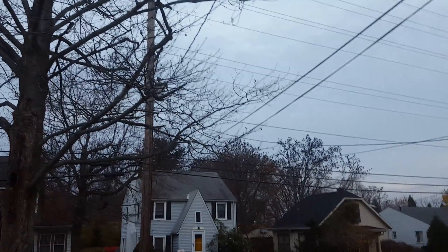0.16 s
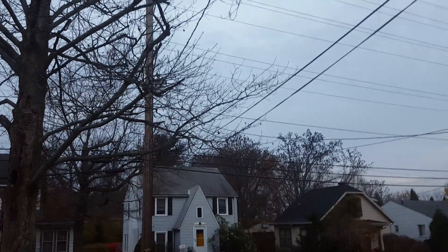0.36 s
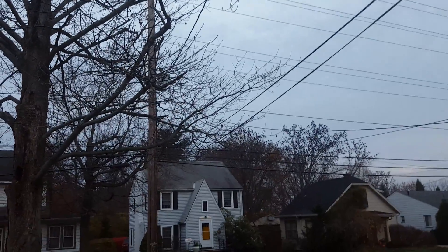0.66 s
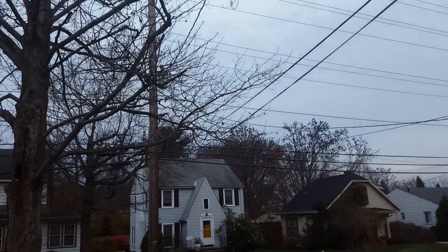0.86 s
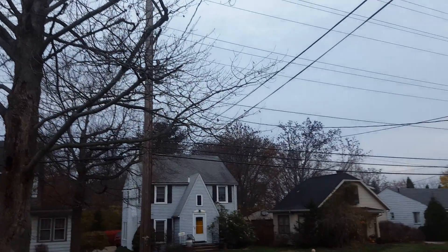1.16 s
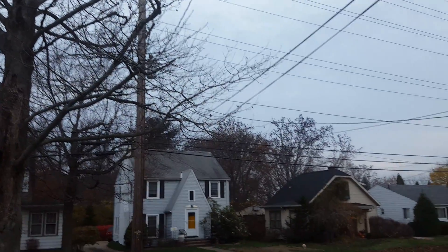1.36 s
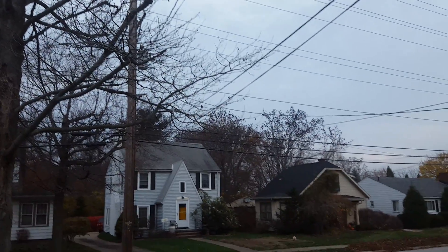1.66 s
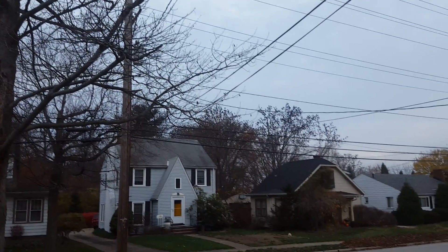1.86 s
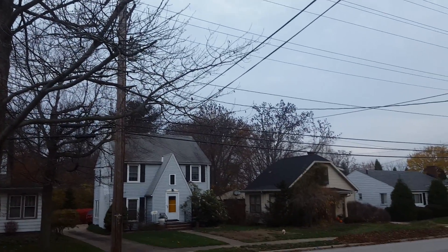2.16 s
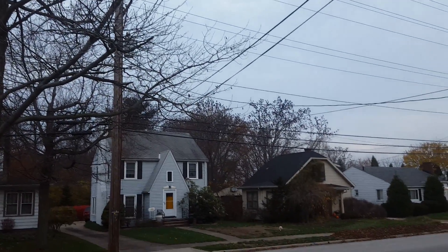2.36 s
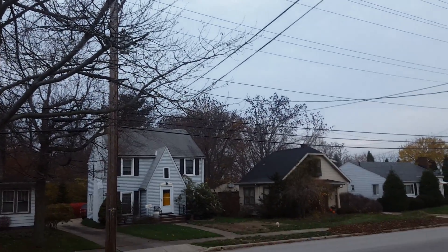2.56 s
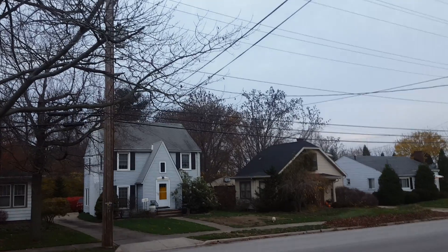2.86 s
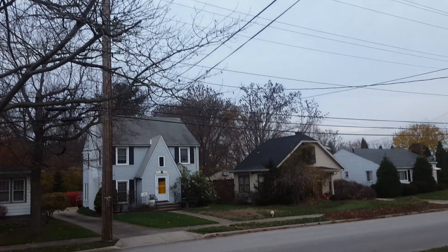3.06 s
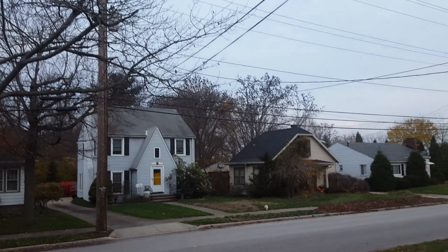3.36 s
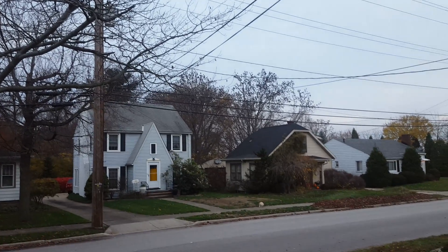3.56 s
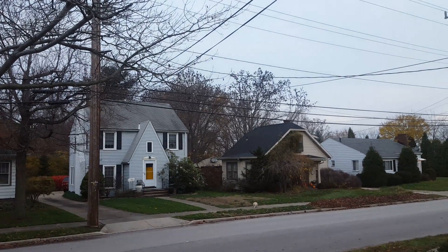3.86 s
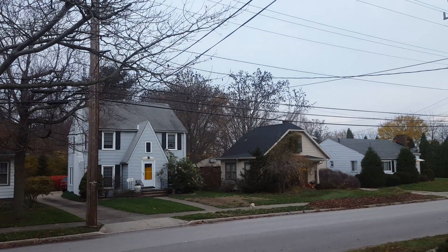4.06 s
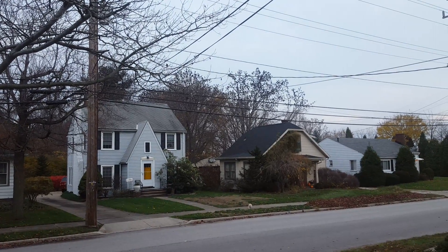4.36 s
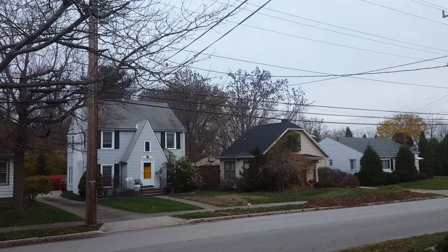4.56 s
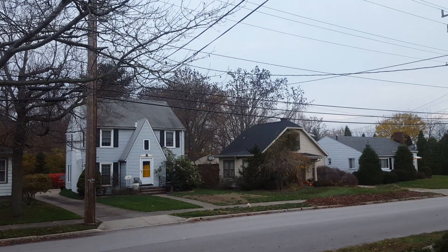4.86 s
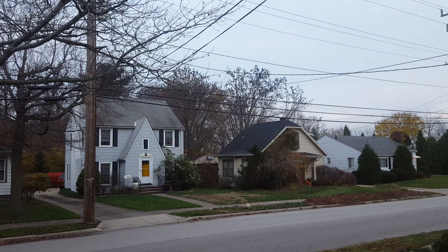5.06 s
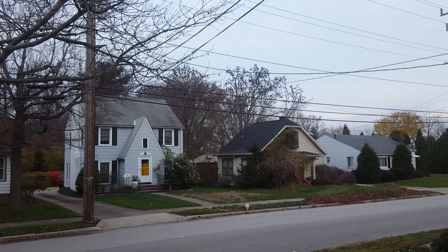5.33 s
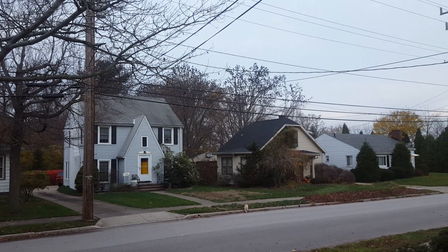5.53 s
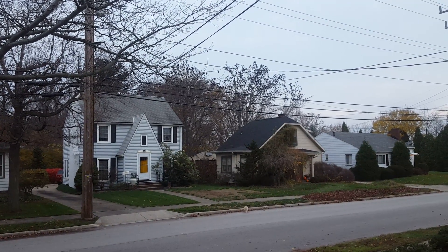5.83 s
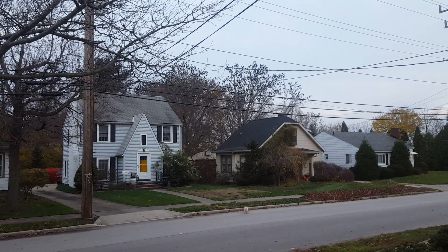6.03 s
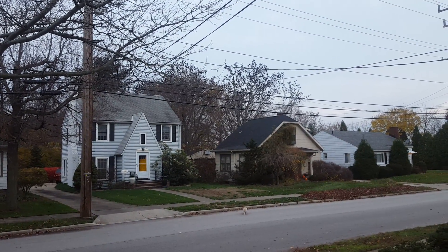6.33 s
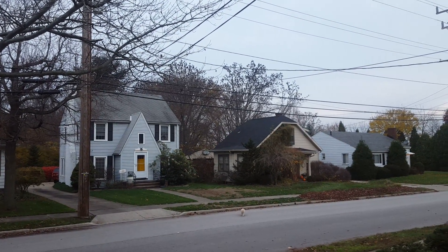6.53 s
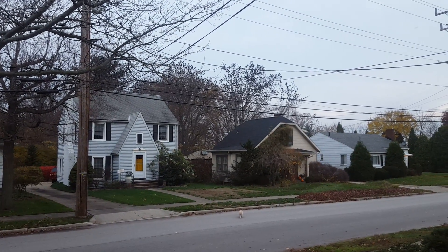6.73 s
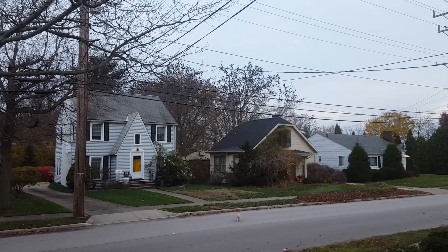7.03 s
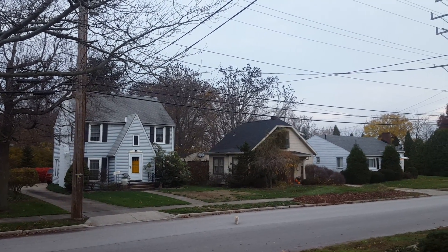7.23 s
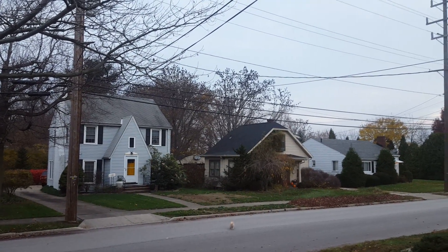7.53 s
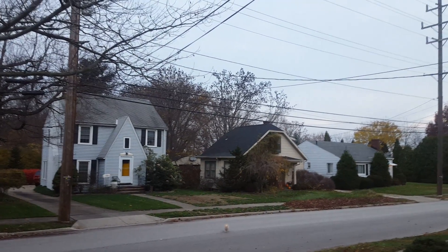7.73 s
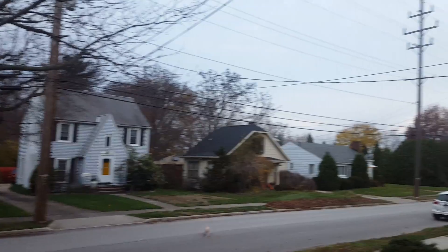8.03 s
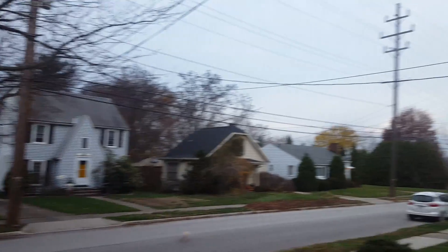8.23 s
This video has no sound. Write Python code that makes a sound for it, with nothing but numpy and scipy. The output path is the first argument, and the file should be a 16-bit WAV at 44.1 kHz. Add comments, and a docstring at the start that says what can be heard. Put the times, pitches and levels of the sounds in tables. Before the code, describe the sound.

Dense starling chatter fills the outdoor air from start to finish, already in full flow and never pausing. Squawks form the middle, with shriller squeals above swelling slightly. Short high chirps and scratchy rasps from closer birds stand out. Faint far traffic lies beneath. Soft bumps occur around two and six seconds; a rough buzzing call precedes several quick thuds close to the end. Diffuse, echoing street ambience, slightly coloured by a small stereo device.

```python
"""From the start a huge flock of starlings in bare street trees washes over far traffic and a faint hum.
Gliding, buzzing calls by the hundred merge with hiss and echo diffusely; nearer arched whistles stand out.
Rasps of rattling noise join after 1 s; dull thumps, decaying sines, knock near 2.4 s and again at 6.5 s.
Near 7.4 s a run of falling sweeps makes one harsh buzz, and a cluster of thumps follows from 7.6 s.
Throughout, two microphone ports colour left and right with their own resonances."""
import sys
import numpy as np
from scipy import signal
from scipy.fft import rfft, irfft, next_fast_len
from scipy.io import wavfile
from scipy.ndimage import uniform_filter1d, map_coordinates

SR = 44100
rng = np.random.default_rng(int(sys.argv[2]) if len(sys.argv) > 2 else 0)


def file_out(sig):
    """Save sig as 16-bit WAV at sys.argv[1]."""
    # one column per channel
    cols = np.atleast_2d(sig).T
    # limit, then scale
    lim = np.clip(cols, -1, 1)
    pcm = np.round(lim * 32767).astype(np.int16)
    wavfile.write(sys.argv[1], SR, pcm)


N = 369994

# relative colour of the far traffic: (frequency [Hz], density [dB per Hz])
TRAFFIC_COLOUR = [(24, -32), (33, -13), (52, -5.5), (70, 1), (115, -6.5), (160, -14.5), (260, -11.5),
                  (450, -16.5), (900, -12), (3000, -46)]
# dull thumps: (time [s], level before attack and decay [dB], pitch [Hz], time to fall 60 dB [s])
THUMPS = [(2.354, -36, 218, 0.026), (2.518, -36, 108, .08), (6.457, -40, 155, 0.17),
          (7.585, -30, 128, 0.063), (7.634, -24.5, 142, 0.036), (7.644, -26, 210, 0.053),
          (7.685, -33, 200, .06), (7.714, -33, 120, 0.085), (7.8168, -18, 335, 0.011),
          (7.832, -26, 116, 0.06)]
# toneless rasps: (time [s], length [s], level [dB])
SCREECHES = [(1.076, .089, -40), (1.51, .048, -38), (1.664, 0.056, -39), (1.75, 0.13, -41),
             (2.153, 0.11, -46), (2.47, 0.11, -43), (2.75, .07, -53), (3.22, 0.12, -40.5),
             (3.796, 0.14, -36), (4.825, 0.08, -34), (5.14, 0.17, -38), (6.8, 0.13, -40),
             (7.172, 0.12, -39), (7.37, 0.09, -37), (7.75, 0.26, -52), (8.358, .06, -33)]
# relative colour of the rasps: (frequency [Hz], density [dB per Hz])
SCREECH_COLOUR = [(2500, -25), (4000, 0), (7200, 2), (8600, -18), (12000, -18), (15000, -42)]
# nearer birds, before arch, rasp and a common trim:
# (time [s], length [s], start [Hz], end [Hz], rasp [0-1], level [dB], left over right [dB])
NEAR_CALLS = [(0.01, 0.16, 6620, 6570, 0.02, -42.5, 4), (.263, 0.039, 6150, 6000, 0.1, -43, -5),
              (0.366, .04, 4020, 3950, 0, -43, 1), (0.495, 0.14, 6450, 6120, 0.15, -44, 0),
              (0.798, 0.12, 6540, 6430, 0.3, -41.5, -5), (.915, .045, 4780, 4680, .1, -43, -4),
              (1.285, 0.053, 3300, 3360, .1, -43, 0), (1.737, 0.065, 6740, 6780, 0.43, -37, 2),
              (1.79, .085, 6800, 6450, 0.52, -44, 0), (1.75, 0.11, 10000, 10800, .5, -55, -5),
              (1.768, 0.032, 6650, 6160, 0.2, -38, 0), (1.78, .05, 6030, 5830, 0.04, -36, 0),
              (1.823, 0.083, 2500, 2620, 0, -42.5, 8), (1.89, 0.041, 2670, 2700, .1, -39, 0),
              (1.95, 0.043, 6110, 6130, 0, -37.5, 2), (1.96, .035, 6650, 6680, .4, -44, 0),
              (1.975, 0.11, 6170, 6290, 0.04, -41, 4), (1.98, .09, 9330, 9380, 0.1, -57, 0),
              (2.97, .07, 10200, 10450, .2, -57, 0), (3.39, 0.098, 8950, 9050, .03, -56, 0),
              (2.17, .17, 7400, 7100, .15, -44, 0), (2.269, 0.052, 6440, 6600, 0.53, -41, 8),
              (2.282, .041, 5030, 5200, .5, -40, -3), (2.551, 0.04, 6640, 6860, 0.4, -34.5, -5),
              (2.828, 0.046, 7100, 7450, .1, -42, 0), (3.13, .055, 8300, 8250, .3, -51, 1),
              (3.36, 0.059, 4530, 4380, 0.12, -37.5, 8), (3.61, 0.077, 6870, 7340, 0.3, -35.5, 3),
              (3.662, 0.07, 7500, 7230, .15, -39.5, 1), (4.011, .07, 6800, 7230, 0.66, -42, -3),
              (4.03, .044, 4550, 4470, 0, -39, 0), (4.47, 0.068, 4670, 4760, 0.2, -33, 1),
              (4.568, 0.07, 6450, 6550, 0.2, -41, 3), (4.705, .05, 2680, 2780, .3, -39, -3),
              (4.957, .05, 8400, 8000, .5, -48, -2), (5.358, 0.042, 5160, 5240, 0.05, -36, 4),
              (5.519, 0.0685, 5030, 5460, 0.15, -37, 5), (5.78, .07, 10500, 10200, .1, -57, -10),
              (5.904, 0.074, 6350, 6450, 0.35, -40.5, 0), (6.11, .04, 2680, 2580, .3, -38, -3),
              (6.2, .045, 2650, 2500, 0.7, -35, -1), (6.301, 0.18, 6800, 7100, .55, -39.5, 1),
              (6.32, .14, 10500, 10600, 0.4, -58, -7), (6.465, .125, 4300, 4000, 0.2, -43, 1),
              (6.516, 0.034, 2760, 2740, 0.2, -35, -4), (6.59, .045, 4800, 4920, .1, -41, 3),
              (6.698, 0.077, 6720, 6800, 0.47, -38, 0), (7.216, 0.11, 6250, 6500, 0.06, -43, -4),
              (7.555, 0.086, 5480, 5250, 0.1, -44, -4), (7.79, .11, 6550, 6650, 0.55, -40.5, -2),
              (8.165, 0.048, 6000, 6260, 0.23, -35.5, -2), (8.29, 0.11, 6430, 6370, 0.25, -47, -2)]
# relative colour of the flock: (frequency [Hz], density [dB per Hz])
FLOCK_COLOUR = [(60, -43), (250, -25), (450, -24.5), (520, -19), (640, -12), (950, -14), (1200, -7),
                (2100, -3), (3200, -0.5), (4400, -5.5), (7200, -9), (8550, -27.5), (10200, -27.5),
                (11700, -27), (15000, -51.5)]
# likeness of left and right in the flock: (frequency [Hz], coherence [-1 to 1])
LIKENESS = [(450, -0.29), (630, 0.54), (1050, -0.15), (1700, -0.12), (2200, 0.52), (2700, 0.028),
            (3250, -0.29), (4200, 0.1), (5200, -0.0095), (6400, -0.014), (12000, -0.16)]
# swell of the shriller squawks about SHRILL_DB: (time [s], level [dB])
SHRILL_SWELL = [(0.0, 0.5), (0.8, 0.5), (1.04, 0), (1.84, 0.5), (2.56, -2), (3.44, 1), (3.6, -0.5),
                (3.84, 0.5), (4.16, -1.5), (4.88, 0), (6.16, 0), (7.44, 0.5), (7.68, 0), (8.39, 0.5)]
# swell of the squeals about SQUEAL_DB: (time [s], level [dB])
SQUEAL_SWELL = [(0.0, 0.5), (0.56, 0.5), (1.6, -0.0), (1.76, 1.5), (2.08, -0.3), (2.24, 0), (2.64, 0),
                (3.2, -0.5), (3.44, -1.2), (3.68, 0), (4.16, -0.5), (4.96, 0), (5.04, -2.3), (5.36, 1.5),
                (5.6, -2), (5.92, 0.2), (6.16, -0.3), (6.4, -0.8), (6.56, -1.7), (6.72, 0), (7.68, -0.7),
                (7.84, 2.0), (8.08, -1), (8.39, -0.5)]
# resonances and notches of each microphone port: (centre [Hz], width [Hz], gain [dB])
LEFT_PORT = [(5557, 145, -5), (6603, 338, 9.7), (9140, 178, 3.9), (12280, 550, 7.3), (13790, 1060, 8.7)]
RIGHT_PORT = [(1605, 524, 2.7), (3520, 346, 2.5), (5147, 768, 5.5), (5784, 155, -6.3), (6483, 279, 6.5)]

HUM_HZ = 368  # a faint far machine
STREET_T60_S = .6  # time for the street echo to fall 60 dB
TOP_HZ = 15300  # band limit
CHATTER_DB, SHRILL_DB, SQUEAL_DB = -30, -35.5, -35.5
FLUTTER_DB, FLUTTER_PER_S = 1.8, 160  # unsteady strength within a nearer call
# the buzz: start, length, first and last centre pitch, sweep level before its attack and fade
BUZZ_S, BUZZ_LENGTH_S, BUZZ_HZ, BUZZ_DB = 7.369, .085, (4780, 4600), -36.5


def amp(db):
    """Decibels to gain."""
    return 10 ** (np.asarray(db) / 20)


def unit(x):
    """Scaled to rms 1."""
    return x / np.sqrt(np.mean(x ** 2) + 1e-20)


def along(points, hz):
    """(Hz, value) points read on a log frequency axis."""
    f, v = np.transpose(points)
    return np.interp(np.log(hz + 1), np.log(f + 1), v)


def level_curve(rows):
    """The gain of a (s, dB) curve at each sample."""
    return amp(np.interp(np.arange(N) / SR, *np.transpose(rows)))


def wobble(rate, size=N):
    """A smooth random curve with rate knots a second."""
    knots = rng.standard_normal(int(size * rate / SR) + 4)
    return map_coordinates(knots, [np.arange(size) * rate / SR])


def filtered(x, response):
    """x shaped by a response that is a function of frequency."""
    m = next_fast_len(N + SR // 2)
    return irfft(rfft(x, m) * response(np.fft.rfftfreq(m, 1 / SR)), m)[..., :N]


def whitened(x, size=801):
    """x with its long-term spectrum flattened inside its band; its movement in time stays."""
    z = rfft(x, next_fast_len(x.shape[1]))
    power = np.abs(uniform_filter1d(np.abs(z) ** 2, size))
    return irfft(z / np.sqrt(power + power.mean() / 10))


def add(track, s, sound):
    """Mix a sound into the track from time s on."""
    part = track[..., max(round(s * SR), 0):][..., :sound.shape[-1]]
    part += sound[..., :part.shape[-1]]


def street(x):
    """Diffuse echo of houses and trees: the energy in each band lingers and dies away as noise."""
    _, t, z = signal.stft(x, SR, nperseg=512)
    keep = amp(-60 * t[1] / STREET_T60_S) ** 2
    energy = signal.lfilter([1 - keep], [1, -keep], np.abs(z) ** 2)
    noise = signal.stft(rng.standard_normal(x.shape), SR, nperseg=512)[2]
    echo = signal.istft(np.sqrt(energy) * noise, SR, nperseg=512)[1][:, :N]
    return x.std() * unit(echo)


def town(rumble_db=-48.5, side_db=-18, hum_db=-69, drift=0.00583):
    """Far traffic as low noise, nearly alike in both ears, and a faint hum that wavers in pitch."""
    noise = rng.standard_normal((2, N))
    mid, side = unit(filtered(noise, lambda hz: amp(along(TRAFFIC_COLOUR, hz))))
    rumble = mid + amp(side_db) * np.array([side, -side])
    hum_hz = HUM_HZ * (1 + drift * wobble(3))
    hum = unit(np.sin(2 * np.pi * np.cumsum(hum_hz) / SR))
    return amp(rumble_db) * rumble + amp(hum_db) * hum


def thumps(attack_cycles=0.4):
    """Soft, low, decaying sine knocks; the deeper ones start more gently."""
    track, t = np.zeros(N), np.arange(SR // 4) / SR
    for s, db, hz, t60 in THUMPS:
        attack = 1 - np.exp(-t * hz / attack_cycles)
        add(track, s, amp(db - 60 * t / t60) * np.sin(2 * np.pi * hz * t) * attack)
    return track


def screeches(rattle_hz=110, rattle_db=1.0):
    """Toneless rasps from nearer birds: gated noise whose strength rattles at random."""
    strength = np.zeros(N)
    for s, length, db in SCREECHES:
        add(strength, s, amp(db) * signal.windows.tukey(int(length * SR)))
    hiss = filtered(rng.standard_normal((2, N)), lambda hz: amp(along(SCREECH_COLOUR, hz)))
    return strength * unit(hiss * amp(rattle_db * wobble(rattle_hz)))


def buzz(sweeps_per_s=170, sweep_s=0.016, fall=0.12, scatter=.025, fade_db=9, attack_s=.005):
    """A near bird's harsh buzz: rough, overlapping downward sweeps that fade into their echo."""
    rasp_depth, rasp_hz, echo_db = .04, 900, -6
    track, u = np.zeros((2, N)), np.linspace(0, 1, int(sweep_s * SR))
    for age in np.arange(0, BUZZ_LENGTH_S, 1 / sweeps_per_s):
        progress = age / BUZZ_LENGTH_S
        shake = scatter * rng.standard_normal() + rasp_depth * wobble(rasp_hz, size=len(u))
        hz = np.interp(progress, [0, 1], BUZZ_HZ) * (1 + shake - fall * (u - .5))
        ear_phase = rng.uniform(-1, 1, (2, 1))
        sweep = np.sin(np.pi * u) * np.sin(2 * np.pi * np.cumsum(hz) / SR + ear_phase)
        attack = np.interp(age, [0, attack_s], [.5, 1])
        add(track, BUZZ_S + age, attack * amp(BUZZ_DB - fade_db * progress) * unit(sweep))
    return track + amp(echo_db) * street(track)


def stray_chirps(low_hz, high_hz, length, glide, rasp, level_db, count):
    """Middle-distance calls at random moments, levelled by the flock's colour; rows as in NEAR_CALLS."""
    rows = []
    for when, high, long, bend, loud, side in rng.uniform(-1, 1, (count, 6)):
        s = (when + 1) / 2 * N / SR
        hz = low_hz * (high_hz / low_hz) ** ((high + 1) / 2)
        db = level_db + 2 * loud + along(FLOCK_COLOUR, hz)
        rows.append((s, length * np.exp(long / 2), hz, hz * (1 + glide * bend), rasp, db, 6 * side))
    return rows


def near_birds(arch=0.0208, rasp_depth=0.063, rasp_hz=700, level_db=-2, echo_db=-9):
    """Single arched whistles that flutter in strength; a raspy one shakes irregularly in pitch."""
    chirps = stray_chirps(low_hz=2100, high_hz=5000, length=.045, glide=.09,
                          rasp=.2, level_db=-41, count=240)
    whistles = stray_chirps(low_hz=5900, high_hz=7400, length=.06, glide=.035,
                            rasp=.08, level_db=-37.5, count=110)
    thin_whistles = stray_chirps(low_hz=7600, high_hz=11500, length=.06, glide=.025,
                                 rasp=.1, level_db=-35, count=60)
    track = np.zeros((2, N))
    for s, length, start_hz, end_hz, rasp, db, pan_db in NEAR_CALLS + chirps + whistles + thin_whistles:
        u = np.linspace(0, 1, int(length * SR))
        swell = np.sin(np.pi * u)
        shake = rasp * rasp_depth * wobble(rasp_hz, size=len(u))
        hz = (start_hz + (end_hz - start_hz) * u) * (1 + arch * (swell - .5) + shake)
        flutter = amp(FLUTTER_DB * wobble(FLUTTER_PER_S, size=len(u)))
        # each bird reaches the two ports out of step
        port_phase = np.array([[0], [rng.uniform(-np.pi / 2, np.pi / 2)]])
        call = swell * flutter * np.sin(2 * np.pi * np.cumsum(hz) / SR + port_phase)
        ear_db = level_db + db + np.array([[pan_db], [-pan_db]]) / 2
        add(track, s, amp(ear_db) * unit(call))
    return track + amp(echo_db) * street(track)


def voices(low_hz, high_hz, length, glide, buzz_hz, buzz_depth, spread_db, calls_per_s, echo_db, count):
    """Birds of varied loudness, each repeating its own short, gliding, buzzing call at loose intervals."""
    track = np.zeros((2, N + SR), dtype=np.float32)
    turns = np.arange(int((N / SR + 1) * calls_per_s))
    for pitch in np.linspace(low_hz, high_hz, count).tolist():
        long, bend, buzz_bend = rng.standard_normal(3).tolist()
        start, bearing, near = rng.random(3)
        t = np.arange(int(SR * length * np.exp(long / 3))) / SR
        u = t / t[-1]
        # the syrinx buzzes in pitch and strength
        flutter = np.sin(2 * np.pi * buzz_hz * np.exp(buzz_bend / 2) * t)
        hz = pitch * (1 + glide * bend * (u - .5) + buzz_depth * flutter)
        phase = 2 * np.pi * np.cumsum(hz) / SR
        tone = np.sin(phase) + np.sin(2 * phase) / 2
        call = tone * np.sin(np.pi * u) * (1 + flutter / 2)
        # the birds sit all around
        mid_side = np.array([[np.cos(np.pi * bearing)], [np.sin(np.pi * bearing)]])
        placed = np.float32(amp(spread_db * near) * mid_side * call)
        for s in (turns + start + rng.random(len(turns)) / 2) / calls_per_s:
            add(track, s, placed)
    direct = unit(whitened(track)[:, SR // 2:][:, :N])  # the chorus is already under way
    return unit(direct + amp(echo_db) * street(direct))


def chorus(crowd, share, far_db):
    """A crowd (mid, side) in the flock's colour, as left and right; the farthest birds blur into hiss."""
    def mid_side_response(hz):
        turn = np.arccos(np.clip(along(LIKENESS, hz), -1, 1)) / 2
        return amp(along(FLOCK_COLOUR, hz)) * np.sqrt(share(hz)) * [np.cos(turn), np.sin(turn)]

    wash = crowd + amp(far_db) * rng.standard_normal((2, N))
    mid, side = filtered(wash, mid_side_response)
    return unit(np.array([mid + side, mid - side]))


def flock(shrill_from_hz=3800, squeal_from_hz=5700):
    """Steady squawks fill the middle; the shriller ones and the squeals above them swell and ebb."""
    def above(edge, hz):  # share of power above an edge
        return 1 / (1 + (edge / (hz + 1)) ** 16)

    squawks = voices(low_hz=600, high_hz=4400, length=.035, glide=.11, buzz_hz=150, buzz_depth=.025,
                     spread_db=4, calls_per_s=3.6, echo_db=-7, count=560)
    shrill = voices(low_hz=3200, high_hz=6300, length=.05, glide=.08, buzz_hz=150, buzz_depth=.015,
                    spread_db=10, calls_per_s=1.6, echo_db=-5, count=300)
    squeals = voices(low_hz=5200, high_hz=9000, length=.09, glide=.03, buzz_hz=170, buzz_depth=.004,
                     spread_db=8, calls_per_s=1.9, echo_db=-6, count=450)
    low = chorus(squawks, lambda hz: 1 - above(shrill_from_hz, hz), far_db=3)
    middle = chorus(shrill, lambda hz: above(shrill_from_hz, hz) * (1 - above(squeal_from_hz, hz)),
                    far_db=4.5)
    high = chorus(squeals, lambda hz: above(squeal_from_hz, hz), far_db=3)
    return (amp(CHATTER_DB) * low
            + amp(SHRILL_DB) * level_curve(SHRILL_SWELL) * middle
            + amp(SQUEAL_DB) * level_curve(SQUEAL_SWELL) * high)


def scene():
    """The flock and its nearer birds over the quiet street."""
    return town() + thumps() + screeches() + buzz() + near_birds() + flock()


def record(dry):
    """Each port adds its own resonances; nothing is kept above the band limit."""
    def colour(port, hz):
        return amp(sum(db * np.exp(-.5 * ((hz - centre) / width) ** 2) for centre, width, db in port))

    heard = filtered(dry, lambda hz: np.array([colour(LEFT_PORT, hz), colour(RIGHT_PORT, hz)]))
    return filtered(heard, lambda hz: hz < TOP_HZ)


dry = scene()
out = record(dry)
file_out(out)
```